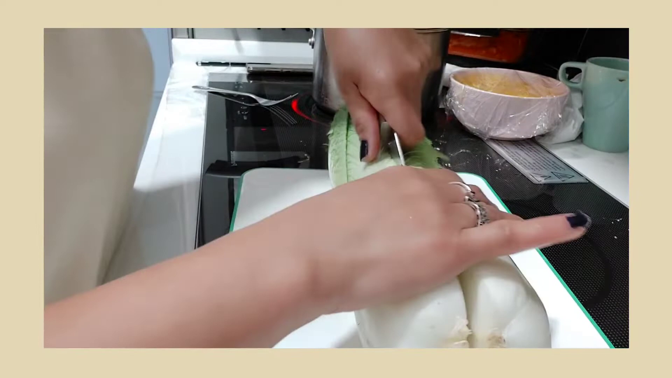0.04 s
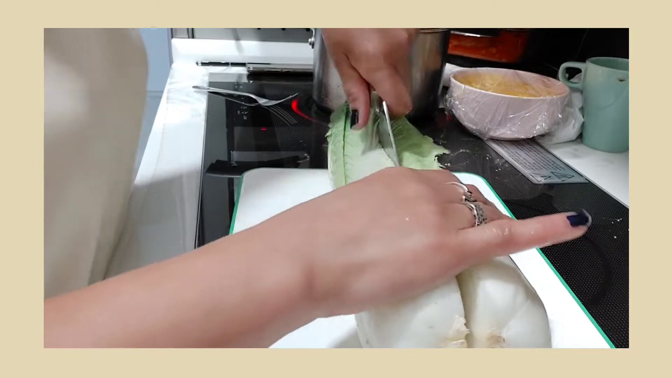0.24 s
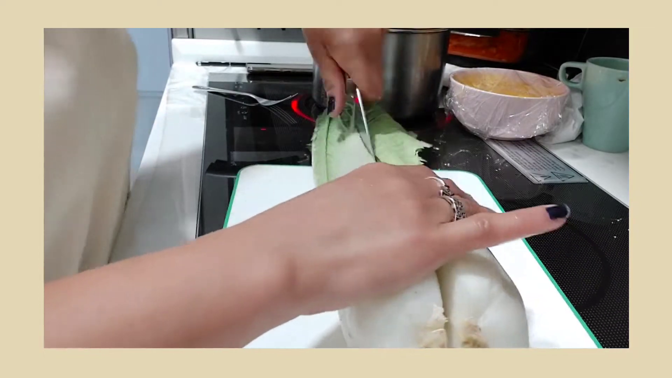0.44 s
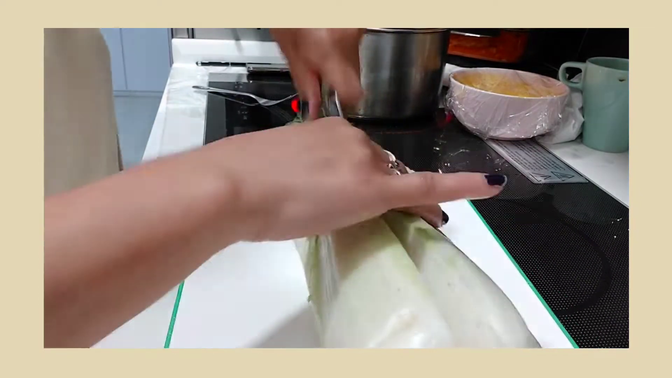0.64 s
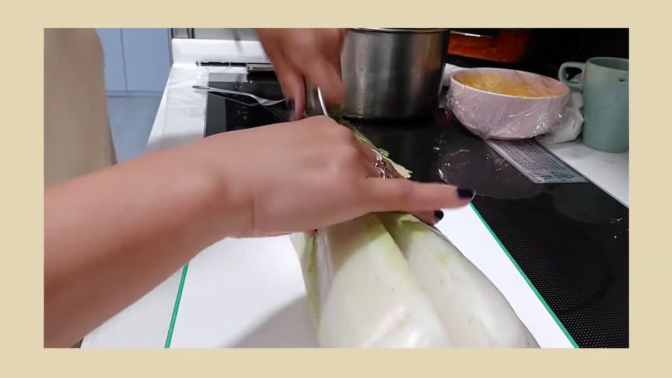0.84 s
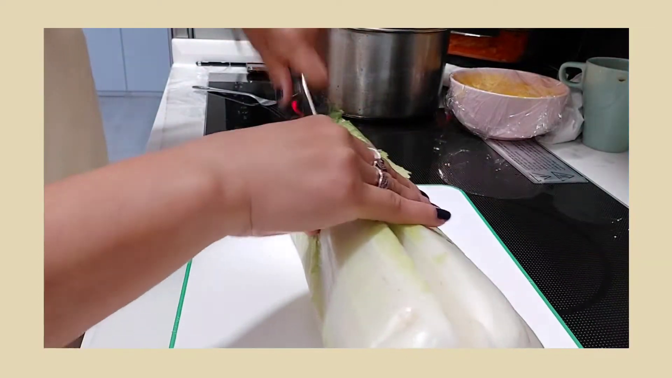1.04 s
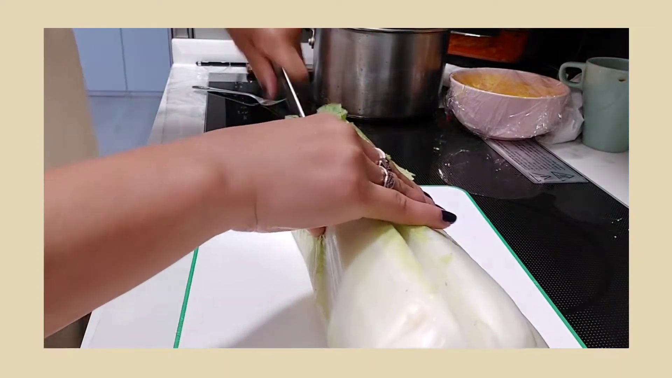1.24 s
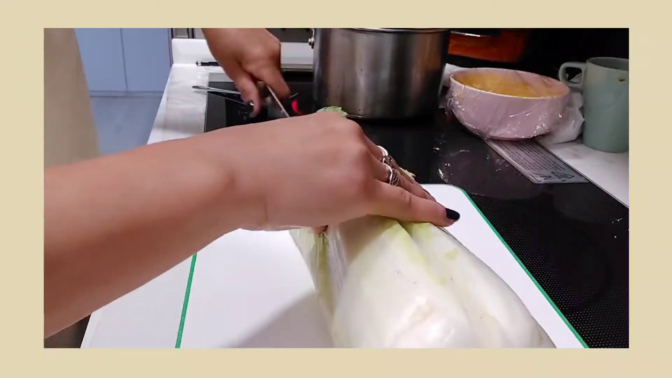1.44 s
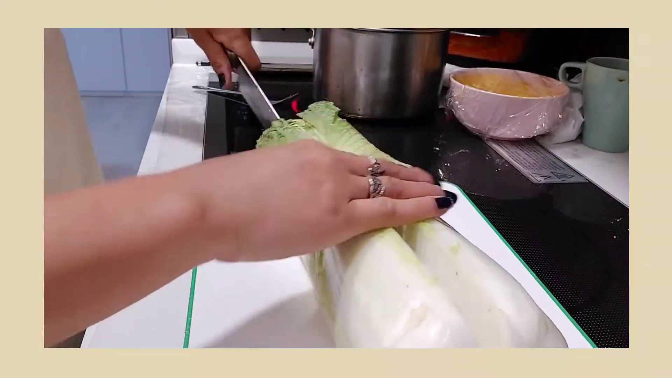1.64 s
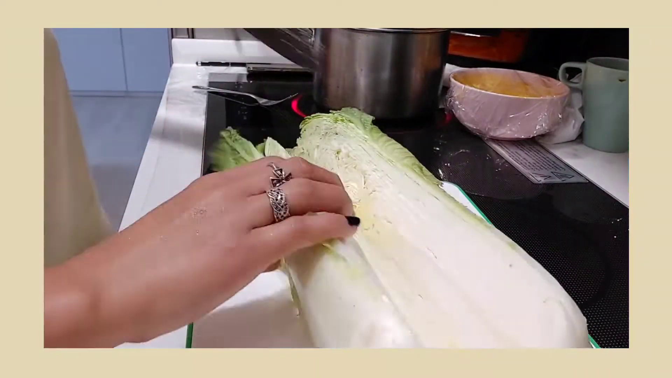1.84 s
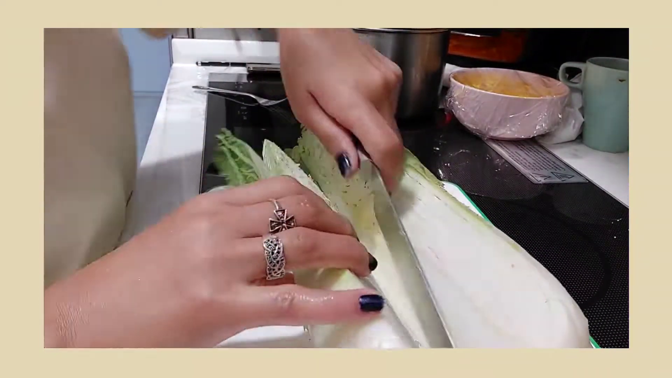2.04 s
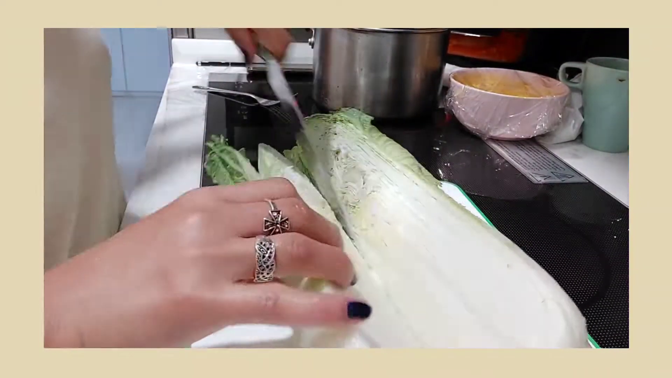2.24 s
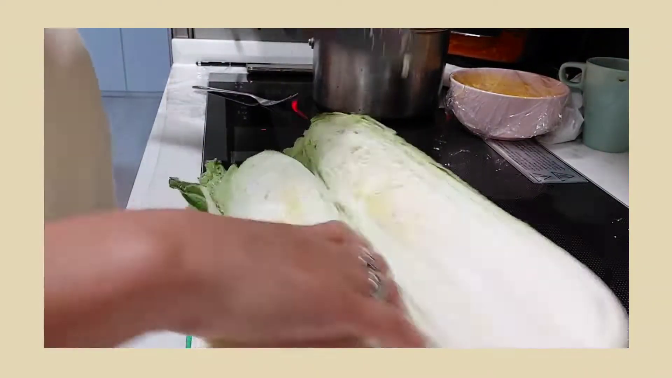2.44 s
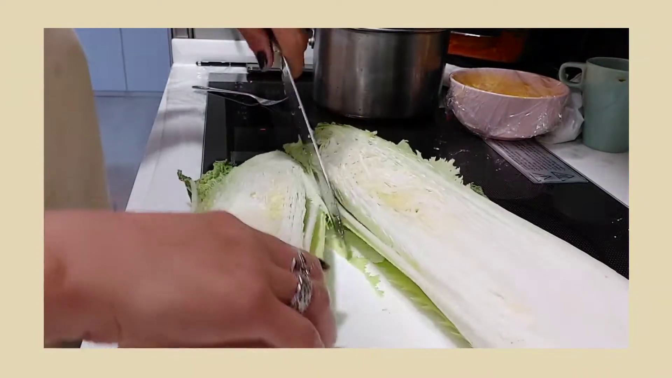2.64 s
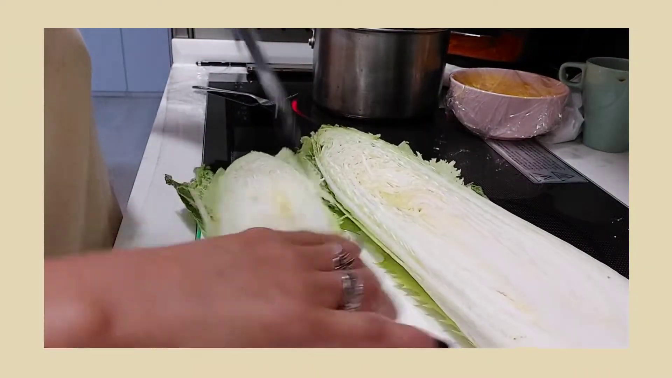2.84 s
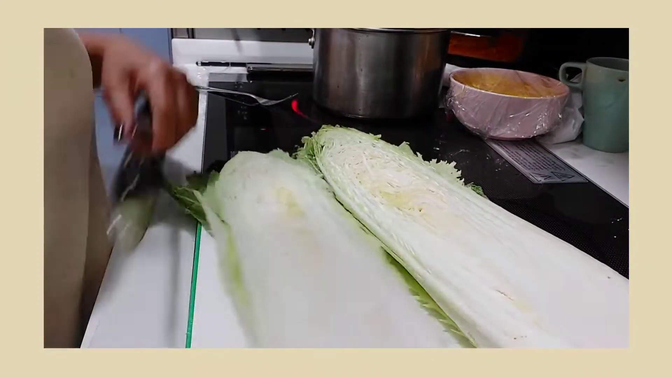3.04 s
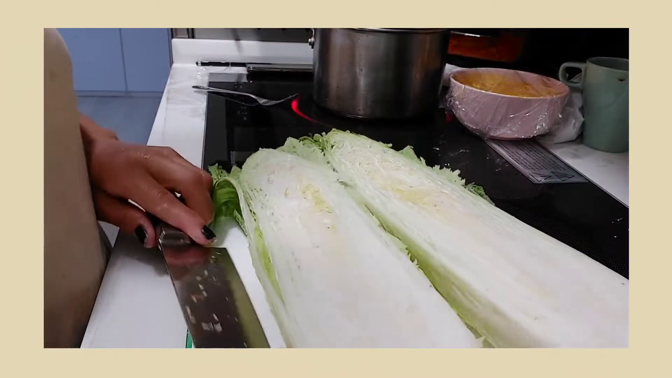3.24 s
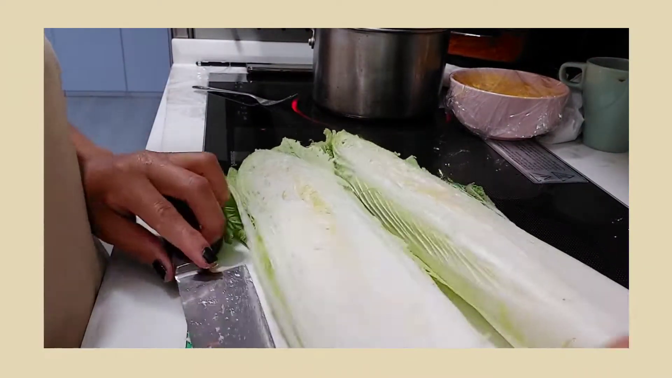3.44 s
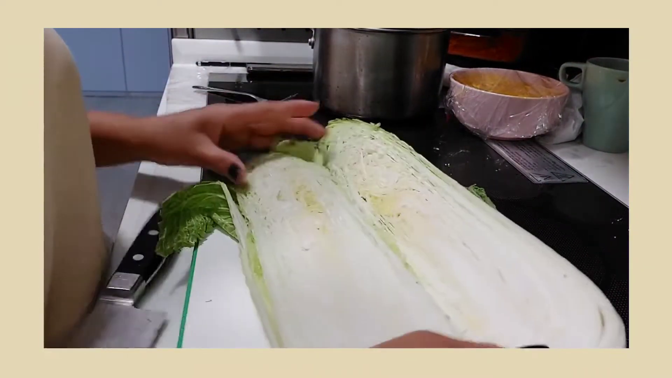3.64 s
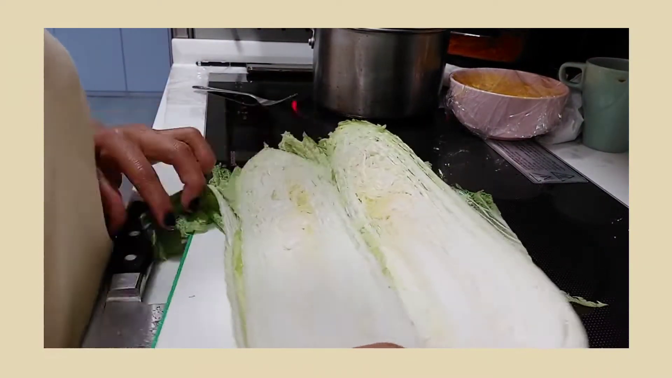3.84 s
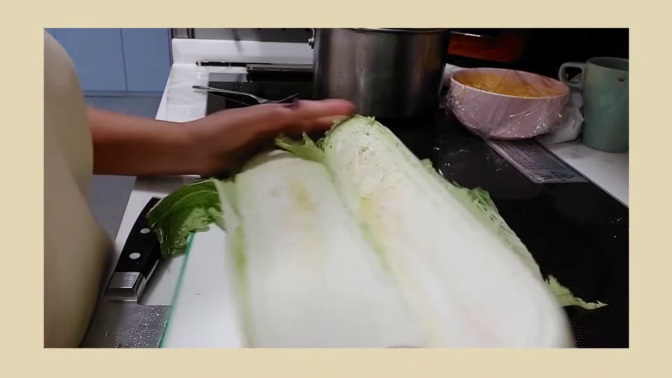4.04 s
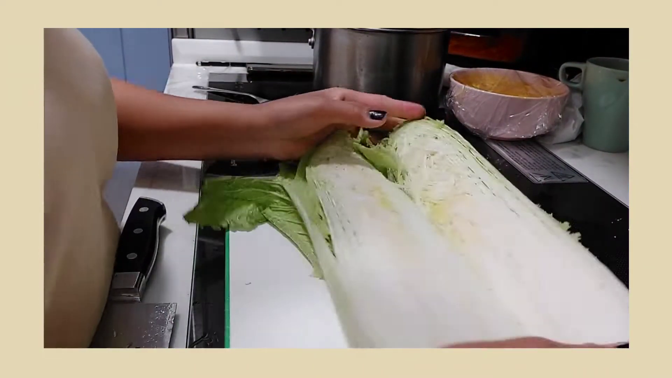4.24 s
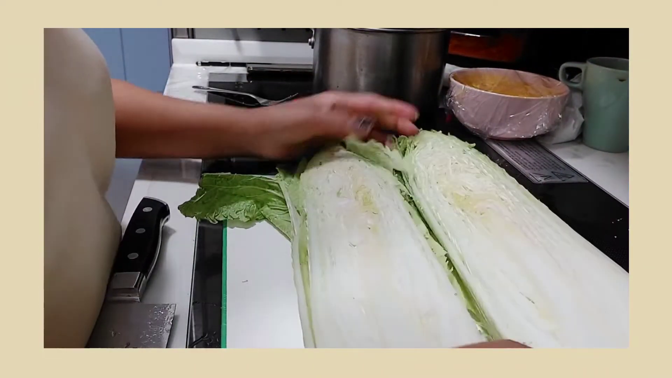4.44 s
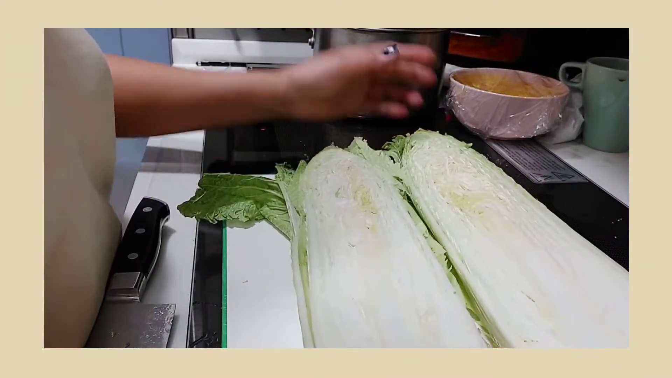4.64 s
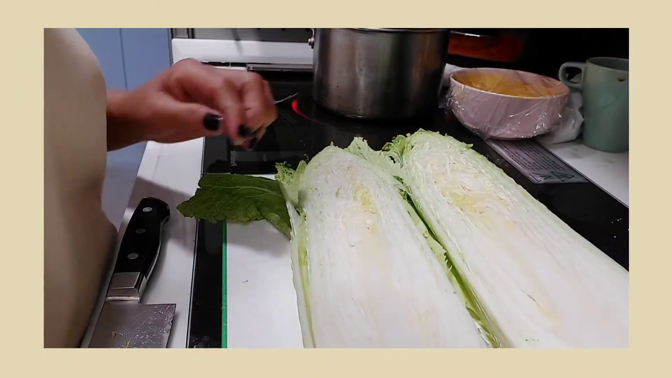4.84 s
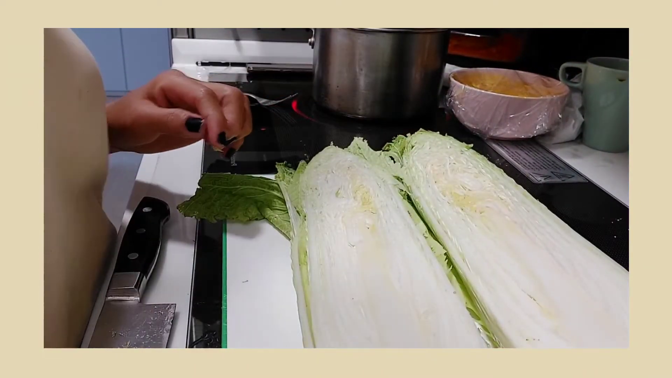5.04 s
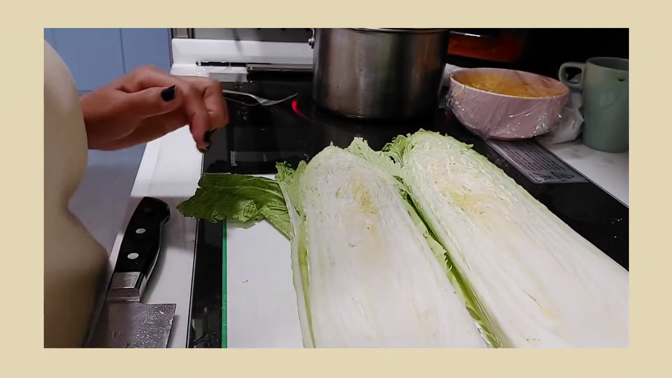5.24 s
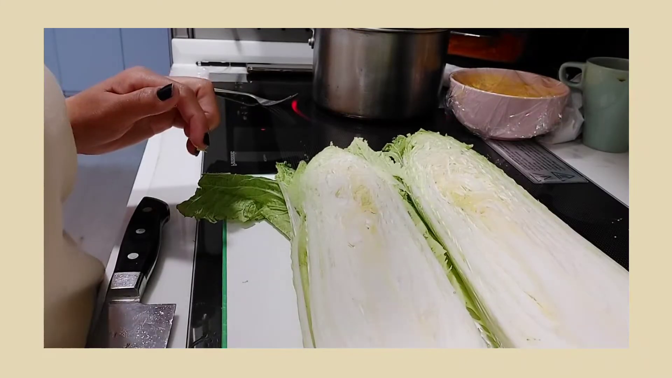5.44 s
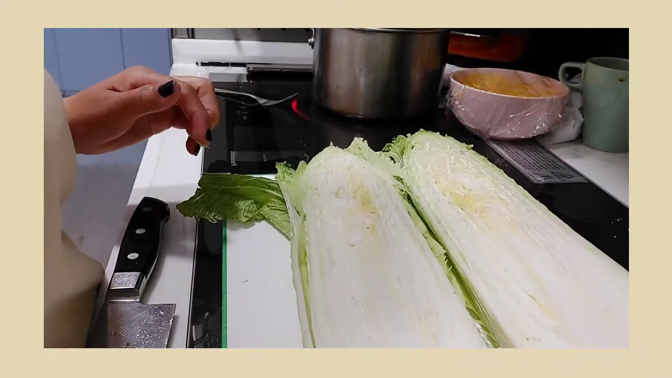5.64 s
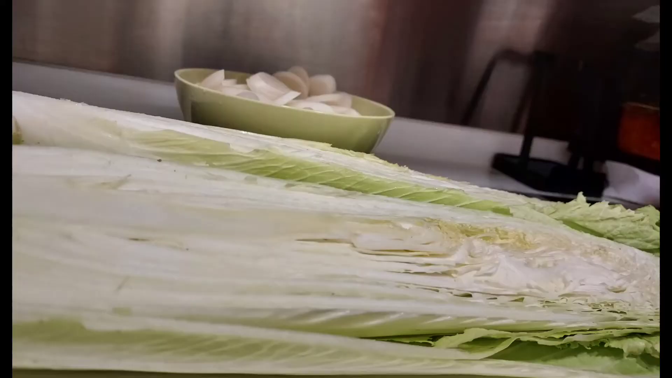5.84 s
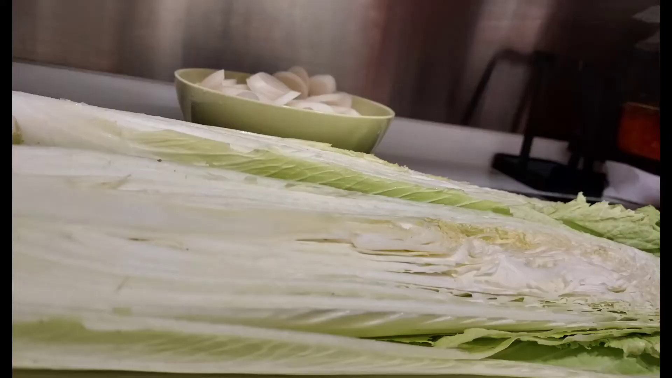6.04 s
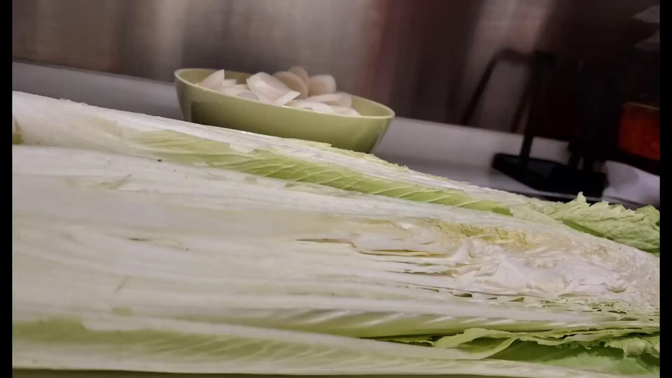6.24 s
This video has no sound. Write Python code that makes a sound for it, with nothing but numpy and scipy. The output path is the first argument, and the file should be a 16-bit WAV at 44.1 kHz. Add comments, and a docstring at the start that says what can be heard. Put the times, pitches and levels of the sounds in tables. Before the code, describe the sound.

Crisp crunching and snapping as a cabbage is cut on a plastic board, followed by a metal knife being set down with a clatter.

```python
"""A knife saws lengthwise through a cabbage on a plastic board, and the halves are torn apart and slide.
Bursting cells crunch and excite the hollow head, ribs snap, the gripped blade squeaks, the board thuds.
The knife is then laid on a stone counter, where repeated impacts ring its modes as it rocks to rest.
The kitchen reverberates and hums with appliances and far traffic until the sound stops short."""
import sys
import numpy as np
from scipy import signal
from scipy.fft import rfft, irfft, next_fast_len
from scipy.io import wavfile
from scipy.ndimage import uniform_filter1d, map_coordinates

SR = 44100
rng = np.random.default_rng(int(sys.argv[2]) if len(sys.argv) > 2 else 0)


def master(y):
    """Save y as 16-bit WAV."""
    cut = np.clip(np.atleast_2d(y).T, -1, 1)
    pcm = np.round(cut * 32767)  # scale
    wavfile.write(sys.argv[1], SR, pcm.astype(np.int16))


N = 277962


def cabbage():
    """Source and filter: cells burst under the edge, ring the hollow head and make the blade squeak."""
    # strokes, tears and slides: t/s, rise/s, hold/s, crunch level/dB, body level/dB, body f/Hz
    strokes = [(0.0, 0.0035, 0.0056, -55.5, -50.5, 465), (.076, .005, 0.033, -45, -41.5, 600),
               (0.104, 0.011, .023, -37, -42, 380), (.197, 0.012, 0.018, -57, -74.5, 414),
               (0.29, 0.018, 0.018, -39, -45.5, 358), (0.493, 0.034, 0.024, -40.5, -45, 520),
               (0.614, .012, 0.08, -59, -55.5, 342), (0.826, 0.033, 0.035, -40.5, -38, 370),
               (1.041, .025, 0.026, -39.5, -32, 367), (1.164, 0.073, 0.0071, -50, -42.5, 570),
               (1.233, .02, 0.022, -39, -28, 670), (1.393, 0.036, 0.014, -42.5, -33, 361),
               (1.497, .036, 0.013, -49.5, -46.5, 656), (1.656, 0.024, 0.031, -50.5, -47.5, 400),
               (1.777, 0.022, 0.012, -41.5, -29.5, 327), (1.844, 0.052, 0.049, -45, -51, 630),
               (2.137, 0.0096, 0.026, -49, -59.5, 430), (2.204, .003, .05, -49, -41, 378),
               (2.249, .015, 0.048, -40.5, -37.5, 330.4), (2.304, 0.023, 0.089, -42.5, -35, 312),
               (2.573, 0.0082, 0.1, -60.5, -60, 450), (2.789, 0.013, 0.027, -60.5, -38, 370),
               (2.812, 0.029, 0.073, -43.5, -34, 360), (3.118, .004, 0.064, -64, -65.5, 396),
               (3.5, 0.0099, 0.015, -59, -52.5, 336), (3.912, 0.02, 0.014, -59, -57, 397),
               (4.097, 0.026, .13, -61, -69.5, 383), (4.397, 0.0067, 0.088, -66.5, -62.5, 484)]
    # spectrum of bursting cells: f/Hz, spectral level/dB
    crunch_spectrum = [(530, -39.5), (900, -11), (1060, -11), (1370, -10), (1520, -32.5), (1780, -10.5),
                       (2580, -9.5), (5550, -11.5), (7210, -15), (8230, -18), (13300, -14), (15900, -16)]
    # resonances of the blade gripped by the leaves: f/Hz, bandwidth/Hz, level/dB
    squeak_modes = [(1469, 240, -2.5), (1717, 195, 2), (2130, 980, -7)]
    # leaf rustle between strokes: t/s, level/dB
    rustle_levels = [(0.0, -54.5), (.3, -71), (.62, -61.5), (.7, -73), (.85, -64), (1.1, -73), (1.39, -62),
                     (1.8, -65), (1.96, -77), (2.25, -53.5), (2.45, -63.5), (2.9, -66), (3.15, -68),
                     (3.35, -64.5), (3.65, -69), (4.04, -65.5), (4.63, -70.5), (4.94, -87.5)]
    # likeness of left and right: f/Hz, correlation
    likeness = [(60, 0.54), (180, 1), (550, 0.59), (1650, 0.037), (4970, -0.032), (15000, 0.18)]
    # left over right: f/Hz, level/dB
    balance = [(60, -1.5), (240, -0.5), (950, 0.51), (3770, 0.0), (15000, -0.5)]
    cells = grains(spread_db=3.5, clump_db=1.6, clump_rate=200)
    crunch = unit(filtered(cells, lambda hz: amp(along(crunch_spectrum, hz))))
    friction = grains(spread_db=3.5, clump_db=1.5, clump_rate=75)
    squeak = unit(filtered(friction, lambda hz: resonant(squeak_modes)(hz) ** 2))
    pushes = grains(spread_db=4.0, clump_db=2.5, clump_rate=70)
    pair, t = np.zeros((2, N)), np.arange(N) / SR
    for s, rise, hold, crunch_db, body_db, body_hz in strokes:
        fall = 0.011 + 0.29 * hold  # a longer stroke dies away more slowly
        knots = s + np.cumsum([-rise, rise, rise, hold, fall, 1.2 * fall])
        span = slice(max(round(knots[0] * SR), 0), round(knots[-1] * SR))
        force = amp(np.interp(t[span], knots, [-34, -17.5, 3.5, 1.0, -19.5, -26]))
        cavity = unit(band(pushes[:, span], body_hz / 1.5, body_hz * 1.338))  # retuned as the cut opens
        upper = unit(band(pushes[:, span], body_hz / 1.1, body_hz * 2.6))
        body = cavity + amp(-3.5 - 110.5 * hold) * upper  # long drags sound more hollow
        body *= amp(np.interp(t[span], knots[2:4], [-5.1, 0.5]))  # pressure builds through a stroke
        body += 0.31 * unit(band(pushes[[0, 0], span], 35, 100))  # the counter rocks under the board
        squeak_db = -8 + 21.5 * hold + 0.23 * crunch_db + 0.77 * body_db  # long drags grip harder
        cut = amp(crunch_db) * crunch[:, span] + amp(body_db) * body + amp(squeak_db) * squeak[:, span]
        pair[:, span] += force * cut
    rustle = amp(curve(rustle_levels) + 2.1 * wobble(21)) * crunch[::, ::-1]
    return stereo(pair + rustle + whistle(), likeness, balance, left_lag_s=-0.000097)


def ribs():
    """Brittle fracture: each snapping rib gives a few damped cycles over a broadband click."""
    # snaps: t/s, level/dB
    snaps = [(0.084, -27), (0.1604, -33), (0.2107, -44), (0.4994, -33), (.613, -36), (.8096, -28.5),
             (.839, -36), (1.048, -39), (1.411, -32.5), (1.5332, -34.5), (1.6813, -27), (1.769, -35),
             (1.8542, -35), (1.8822, -29), (1.9008, -36), (1.9194, -25), (2.1006, -46), (2.1464, -33),
             (2.2095, -22), (2.692, -41), (2.7304, -39), (3.509, -39), (5.6818, -48.5)]
    out, t = np.zeros((2, N)), np.arange(SR // 25) / SR
    for s, db in snaps:
        hz = 2180 * np.exp(rng.normal(0, 0.068))
        burst = rng.standard_normal((2, len(t))) * (decay(t, 0.0017) + 0.19 * decay(t, 0.056))
        click = 0.5 * np.diff(burst, prepend=0)
        ring = np.sin(2 * np.pi * hz * t) * decay(t, 0.0019)
        add(out, s, amp(db - 1.5) * (click + ring), pan_db=rng.normal(0.6, 2))
    return out


def squeals():
    """Stick-slip friction: a rough tone climbs as the leaves tighten their grip on the blade."""
    # the blade sticks early in a long drag: t/s, duration/s, level/dB, starting f/Hz
    grips = [(2.278, .048, -34.5, 1480), (2.794, .04, -40.5, 1488)]
    out, climb_hz_per_s = np.zeros((2, N)), 2500
    for s, length, db, hz in grips:
        t = np.arange(round(length * SR)) / SR
        roughness = np.cumsum(rng.normal(0, 0.04, (2, len(t))), axis=1)
        phase = 2 * np.pi * (hz + climb_hz_per_s * t / 2) * t + roughness
        arch = np.sqrt(np.abs(np.sin(np.pi * t / length)))
        add(out, s, amp(db) * arch * np.sin(phase))
    return out


def whistle():
    """Narrowband resonance: filtered noise is heard as a faint, wavering whistle during the sawing."""
    t, start_s, stop_s = np.arange(N) / SR, 0.14, 1.63
    outside_s = np.maximum(0, np.maximum(start_s - t, t - stop_s))
    tone = unit(filtered(rng.standard_normal((2, N)), lambda hz: resonant([(1660, 130, 0)])(hz) ** 2))
    return amp(-65.5 + 2.2 * wobble(12.4)) * decay(outside_s, 0.45) * tone


def board():
    """Damped vibration: each landing gives a dull ring of sagging pitch, an overtone and a slap."""
    # the blade or a half lands on the board: t/s, level/dB, f/Hz, T60/s
    thuds = [(.135, -19, 184, 0.037), (.324, -25.5, 149, 0.064), (1.078, -10, 203, 0.016),
             (1.269, -14.5, 218, 0.019), (1.431, -16, 272, 0.022), (1.795, -12, 255, 0.026),
             (1.889, -31.5, 607, 0.027), (2.208, -25, 197, 0.025), (2.335, -30.5, 283, 0.11),
             (2.402, -24, 243, 0.027), (2.73, -17, 327, 0.031), (2.851, -23, 225.5, .14),
             (3.404, -33.5, 126.5, 0.16), (3.562, -41, 154, 0.15), (3.664, -15.5, 220, 0.024),
             (3.686, -19, 143, .05)]
    out, t = np.zeros((2, N)), np.arange(SR // 8) / SR
    attack = 1 - np.exp(-t / 0.0018)
    slap_envelope = amp(-20) * decay(t, 0.037) + amp(-26.5) * decay(t, 0.14)
    for s, db, hz, t60 in thuds:
        phase = 2 * np.pi * hz * t * (1 + 0.05 * np.exp(-t / 0.0051))
        overtone = 2.2 * decay(t, 0.0085) * np.sin(2.5 * phase)
        ring = (np.sin(phase) + overtone) * decay(t, t60) * attack
        slap = band(rng.standard_normal((2, len(t))), 500, 3500) * slap_envelope
        add(out, s, amp(db + 4.0) * (slap - ring))
    lead_s = 7e-5  # the board is nearer the left side
    return filtered(out, lambda hz: np.exp(1j * np.pi * hz * np.array([[lead_s], [-lead_s]])))


def knife():
    """Modal impact: each contact rattles the knife, knocks its handle and rings modes its spot favours."""
    # contacts with the counter: t/s, level/dB, handle gain/dB, edge gain/dB, favoured f/Hz, ring gain/dB
    contacts = [(3.0837, -52.5, -1.5, 4.5, 2180, -5), (3.315, -53, -12, 10.5, 1800, -15),
                (3.4007, -39.5, -7.5, 1, 3874, -1), (3.6505, -34, 3.5, -16.5, 1880, -13),
                (3.6626, -8, -2, -13.5, 2670, -6), (3.674, -6, -8, -9, 2290, -9),
                (3.6811, -17, -2, -20.5, 5140, -3), (3.6964, -27, 2.5, -18, 3900, -10),
                (3.7322, -22, 0.5, 3.3, 3960, -18), (3.7441, -16, -6, -11, 4670, -11),
                (3.7562, -37, -17, 11.5, 4340, 0), (3.7867, -17, -9.5, -38, 1990, 6),
                (3.8161, -40, 15, -22, 1820, -8), (3.8615, -50, -20, 5, 4450, -8),
                (3.8923, -44, -26, 1.5, 3900, -12), (3.9125, -54, -23, 10, 4720, -7),
                (3.9296, -46, -1.5, 1, 4400, -14), (4.0084, -36.5, -3, 0.5, 2010, -3),
                (4.0475, -32, -3, 4, 5940, -10), (4.0782, -38.5, -3.5, 4.5, 5170, -9),
                (4.1237, -44, -6, 8, 1890, -15), (4.1624, -44.5, -7, 3, 4100, -9),
                (4.2138, -54, -18, -0.5, 3900, -3)]
    # blade modes: f/Hz, level/dB, T60/s before damping by the stone
    blade_modes = [(1890, -2, .04), (2399, -7, 0.045), (2970, -11, 0.088), (3860, 0, 0.16),
                   (4420, 1.5, 0.11), (5190, -5, 0.086), (5800, -7.5, 0.048), (6980, -7.5, 0.11),
                   (7800, -14, .04), (8940, -14, 0.033), (10230, -8, 0.055), (10600, -9, .04),
                   (10840, -5.5, 0.055), (11800, -5.5, 0.06), (12920, -6, .05), (13600, -10.5, .05),
                   (14950, -14, .05)]
    # handle resonances: f/Hz, bandwidth/Hz, level/dB
    handle_modes = [(390.4, 560, -7), (640, 160, -1.5), (870, 79, 1.5), (995, 190, -2.5), (1229, 90, -3.5),
                    (1568, 100, 0), (1940, 220, -10.5)]
    blade, handle = np.zeros((2, 2, N))
    t, rattle_t60, stone_t60, pan_db = np.arange(SR // 5) / SR, 0.087, 0.548, 0.2
    for s, db, knock_db, edge_db, favoured_hz, ring_db in contacts:
        rattle, edge, knock = rng.standard_normal((3, 2, len(t))) * decay(t, rattle_t60)
        for hz, mode_db, t60 in blade_modes:
            spot_db = edge_db if hz > 6500 else -26 * abs(np.log2(hz / favoured_hz))
            roughness = np.cumsum(rng.normal(0, 0.055, len(t))) + rng.uniform(0, 2 * np.pi, (2, 1))
            gain = amp(db + ring_db + mode_db + spot_db + rng.normal(0, 1.7))
            envelope = decay(t, t60) * decay(t, stone_t60)
            add(blade, s, gain * envelope * np.sin(2 * np.pi * hz * t + roughness), pan_db)
        rattle = band(rattle, 2200, 5700) + 2.6 * band(rattle, favoured_hz / 0.99, favoured_hz * 1.1)
        add(blade, s, amp(db - 5.0) * rattle, pan_db)
        add(blade, s, amp(db + edge_db - 5.5) * band(edge, 6300, 16500), pan_db)
        add(handle, s, amp(db + knock_db + 15.5) * decay(t, 0.1) * (knock + 0.32 * knock[0]), pan_db)
    return blade + filtered(handle, resonant(handle_modes))


def kitchen(x):
    """Reverberation: reflections from the walls decay exponentially, each frequency at its own rate."""
    # reverberation time: f/Hz, T60/s
    decay_times = [(200, 0.38), (2000, .15), (10000, 0.027)]
    hz, t, spectra = signal.stft(rng.standard_normal((2, SR // 3)), SR, nperseg=256)
    tail = signal.istft(spectra * decay(t, along(decay_times, hz)[:, None]), SR, nperseg=256)[1]
    delayed = np.pad(x, ((0, 0), (200, 0)))
    return signal.fftconvolve(delayed, tail / np.linalg.norm(tail[0]), axes=1)[:, :N]


def hum():
    """Ambient noise: appliances and far traffic sum to a dull, slightly patchy rumble."""
    # rumble spectrum: f/Hz, spectral level/dB
    spectrum = [(12, -49.5), (20, -18), (53, -14), (110, -3.5), (127, -7.5), (172, -14.5), (255, -15.5),
                (574, -23.5), (642, -21), (759, -21), (976, -25.5), (2460, -40.5), (3950, -52.5),
                (14700, -60), (16000, -64.5)]
    # slow drift of the rumble: t/s, relative level/dB
    levels = [(0.0, -54.5), (1.3, -55), (2.3, -58), (2.95, -54.5), (3.3, -56), (3.79, -51), (4.4, -55.5),
              (5.15, -55.5), (5.6, -56)]
    # likeness of left and right: f/Hz, correlation
    likeness = [(60, 1), (180, 0.92), (550, 0.47), (1650, -0.32), (4970, -0.25), (15000, -0.02)]
    # left over right: f/Hz, level/dB
    balance = [(60, -2.0), (240, -1.5), (950, 1.5), (3770, -0.34), (15000, 0.0)]
    spectra = signal.stft(rng.standard_normal((2, N)), nperseg=1024)[2]
    patches = uniform_filter1d(rng.standard_normal(spectra.shape[1:]), size=8, axis=0)
    patches = uniform_filter1d(patches, size=6, axis=1)
    noise = signal.istft(spectra * amp(2.2 * unit(patches)), nperseg=1024)[1][:, :N]
    rumble = unit(filtered(noise, lambda hz: amp(along(spectrum, hz))))
    return amp(curve(levels) + 7.0) * stereo(rumble, likeness, balance, left_lag_s=-0.00016)


def amp(db):
    """Amplitude ratio of a level in dB."""
    return 10 ** (np.asarray(db) / 20)


def decay(t, t60):
    """Exponential decay by 60 dB in t60 seconds."""
    return amp(-60 * t / t60)


def unit(x):
    """Normalisation to rms 1."""
    return x / np.sqrt(np.mean(x ** 2) + 1e-20)


def along(points, hz):
    """Interpolation of (f/Hz, value) points on a logarithmic frequency axis."""
    f, values = np.transpose(points)
    return np.interp(np.log(hz + 1), np.log(f + 1), values)


def curve(points):
    """Linear interpolation of (t/s, value) points at every sample."""
    return np.interp(np.arange(N) / SR, *np.transpose(points))


def wobble(rate):
    """Smooth random modulation with rate knots a second."""
    return map_coordinates(rng.standard_normal(int(N * rate / SR) + 4), [np.arange(N) * rate / SR])


def grains(spread_db, clump_db, clump_rate):
    """Log-normal modulation: two streams of cell bursts, uneven in size and arriving in clumps."""
    sizes = amp(spread_db * rng.standard_normal((2, N)) + clump_db * wobble(clump_rate))
    return unit(sizes * rng.standard_normal((2, N)))


def filtered(x, response):
    """Linear filtering: the spectrum is multiplied by a complex frequency response."""
    size = next_fast_len(N + SR // 2)
    return irfft(rfft(x, size) * response(np.fft.rfftfreq(size, 1 / SR)), size)[..., :N]


def band(x, low_hz, high_hz):
    """Band-pass filtering of a burst."""
    sections = signal.butter(2, [low_hz, min(high_hz, SR / 2.2)], "band", fs=SR, output="sos")
    return signal.sosfilt(sections, x)


def resonant(modes):
    """Modal sum of resonances (f/Hz, bandwidth/Hz, level/dB), alternating in sign."""
    return lambda f: sum((-1) ** k * amp(db) * 1j * f * width / (hz * hz - f * f + 1j * f * width)
                         for k, (hz, width, db) in enumerate(modes))


def stereo(pair, likeness, balance, left_lag_s):
    """Mid-side mixing gives two unrelated signals a correlation, a balance and a delay."""
    angle = lambda hz: np.arccos(np.clip(along(likeness, hz), -1, 1)) / 2
    mid, side = filtered(pair, lambda hz: np.array([np.cos(angle(hz)), np.sin(angle(hz))]))
    left = lambda hz: amp(along(balance, hz) / 2) * np.exp(-1j * np.pi * hz * left_lag_s)
    return filtered(np.array([mid + side, mid - side]), lambda hz: np.array([left(hz), 1 / left(hz)]))


def add(track, s, sound, pan_db=0):
    """Superposition of a sound on a track at s seconds, pan_db louder on the left."""
    start = round(s * SR)
    track[:, start:start + sound.shape[-1]] += sound * amp([[pan_db / 2], [-pan_db / 2]])


def scene():
    """Superposition of the cutting, the impacts with their reverberation, and the hum."""
    impacts = board() + ribs() + knife()
    room = amp(-21) * kitchen(impacts)
    return cabbage() + squeals() + impacts + room + hum()


def record(dry):
    """Gating and band limiting: the sound is cut to silence and steeply low-passed."""
    end_s, top_hz = 5.7105, 16000
    return filtered(dry * (np.arange(N) < end_s * SR), lambda hz: 1 / (1 + (hz / top_hz) ** 160))


dry = scene()
out = record(dry)
master(out)
```